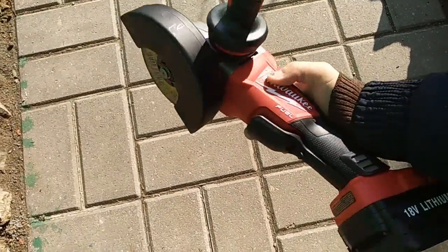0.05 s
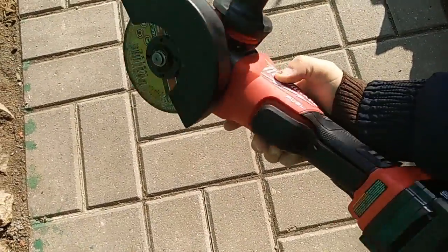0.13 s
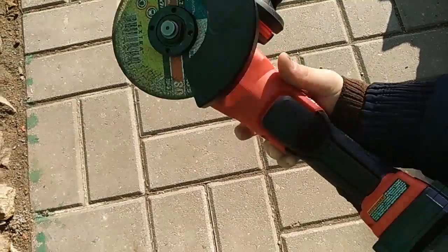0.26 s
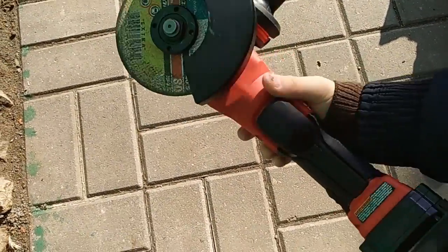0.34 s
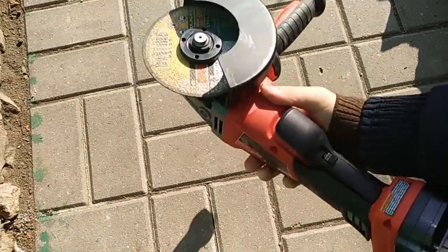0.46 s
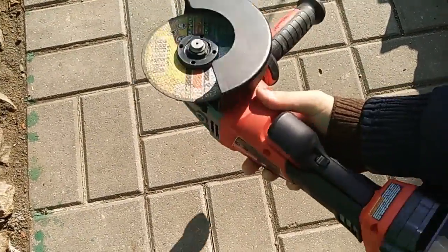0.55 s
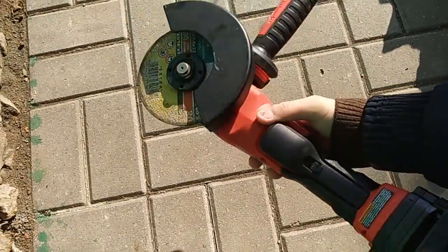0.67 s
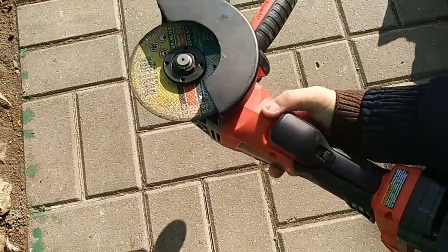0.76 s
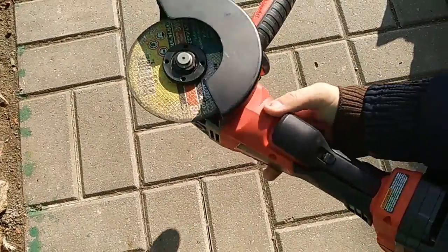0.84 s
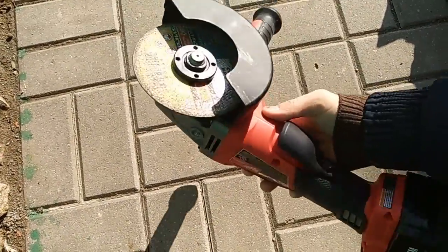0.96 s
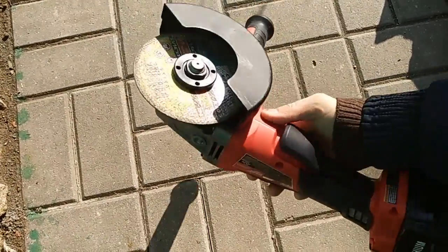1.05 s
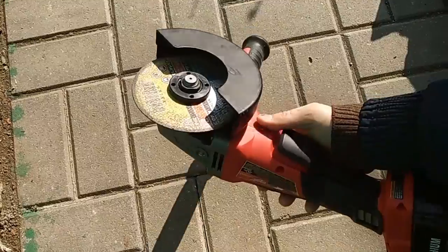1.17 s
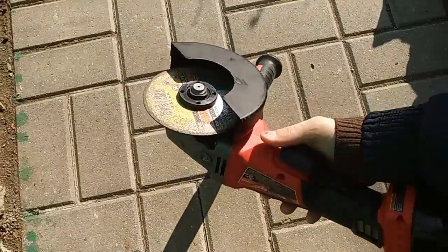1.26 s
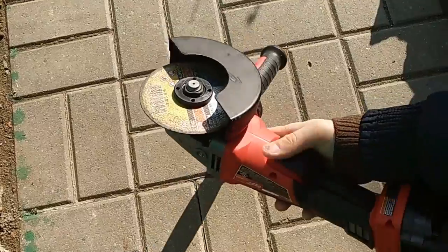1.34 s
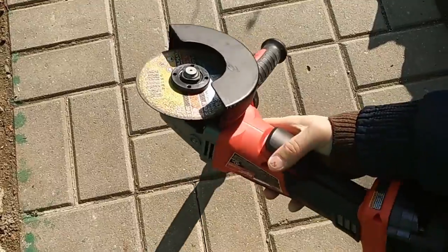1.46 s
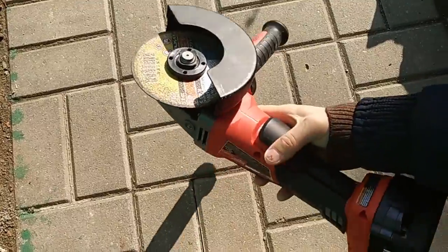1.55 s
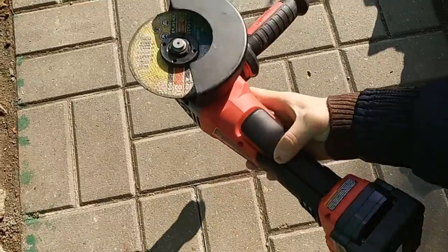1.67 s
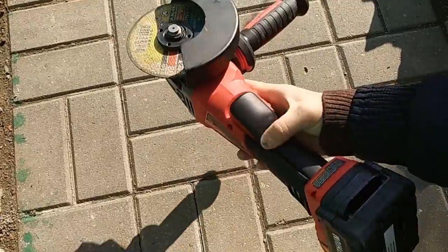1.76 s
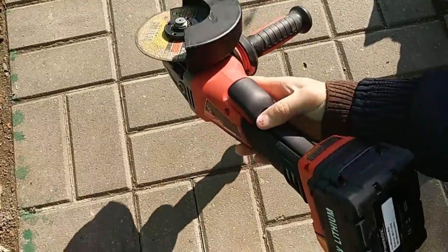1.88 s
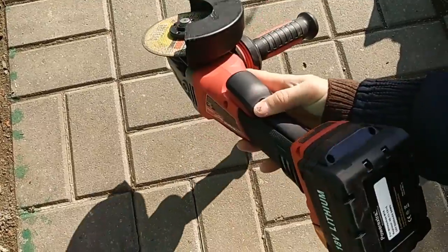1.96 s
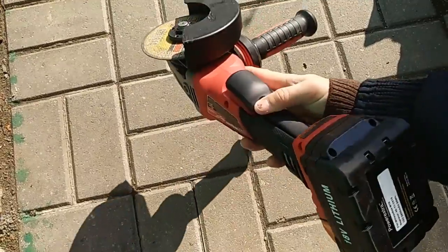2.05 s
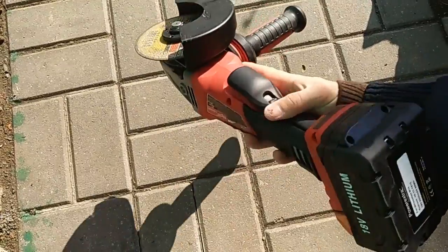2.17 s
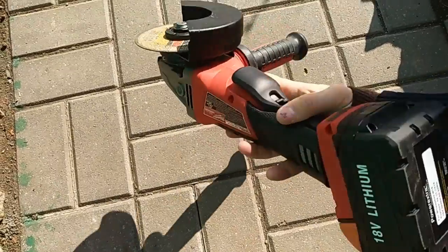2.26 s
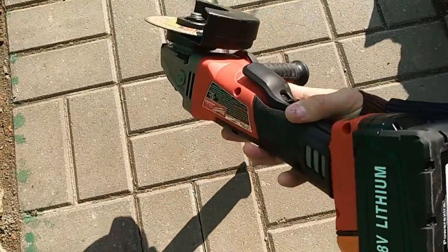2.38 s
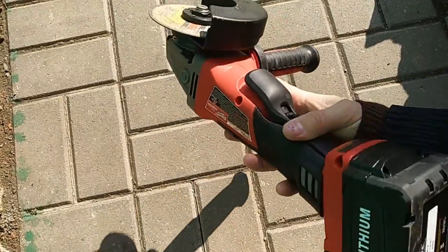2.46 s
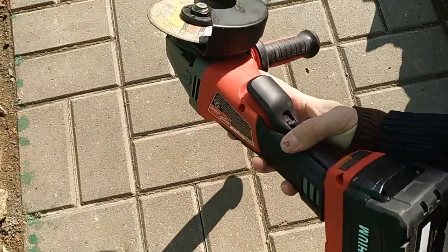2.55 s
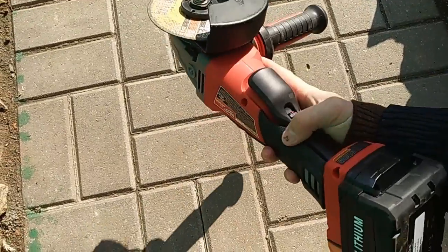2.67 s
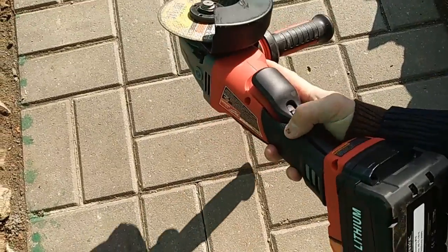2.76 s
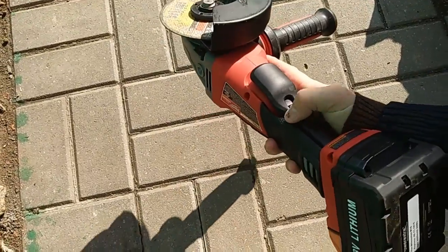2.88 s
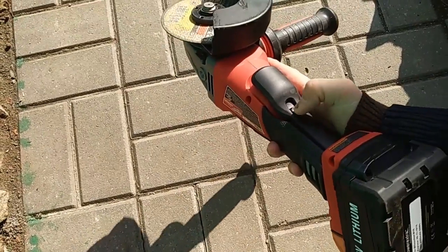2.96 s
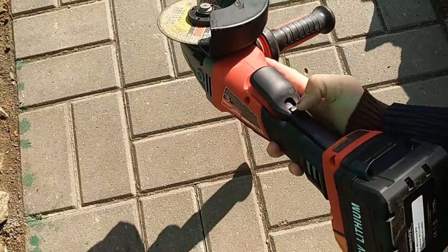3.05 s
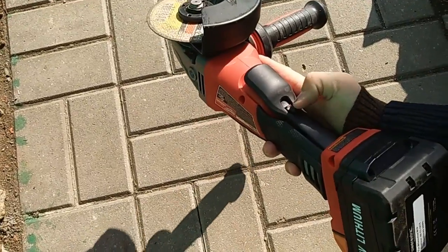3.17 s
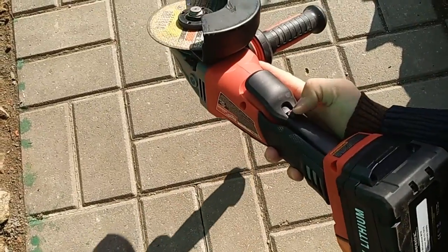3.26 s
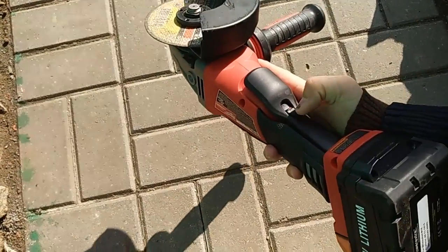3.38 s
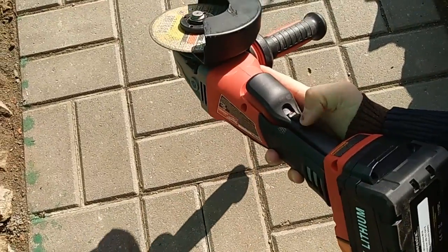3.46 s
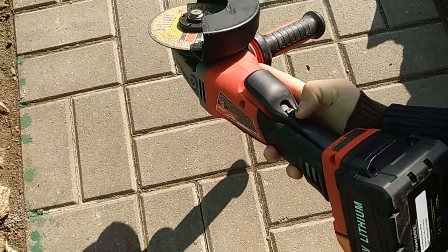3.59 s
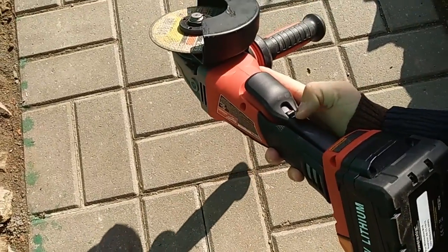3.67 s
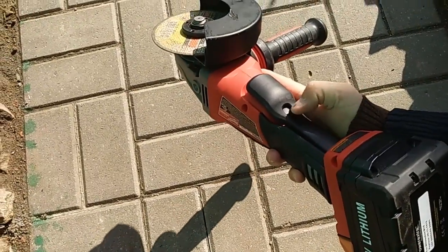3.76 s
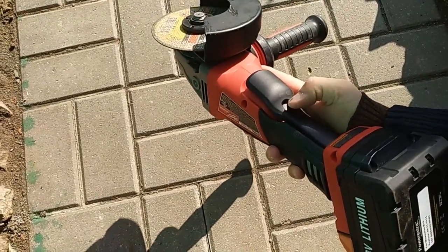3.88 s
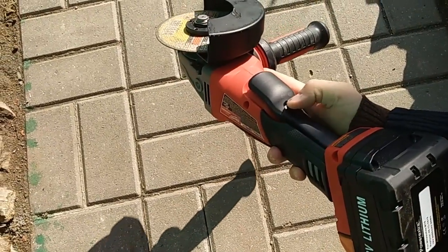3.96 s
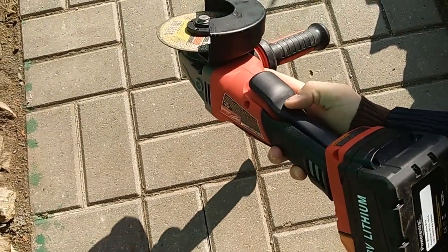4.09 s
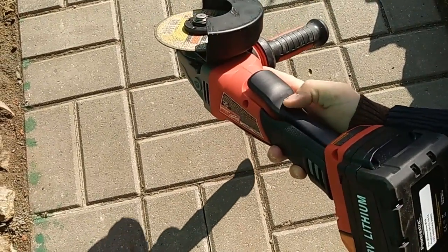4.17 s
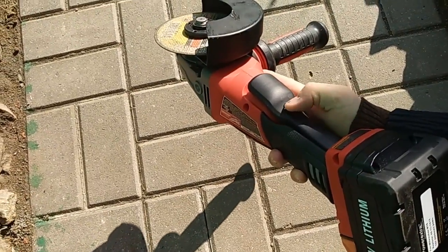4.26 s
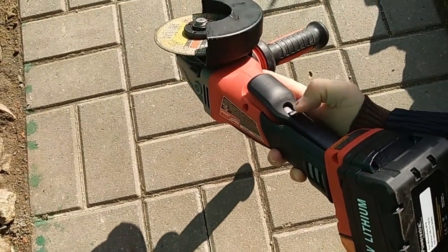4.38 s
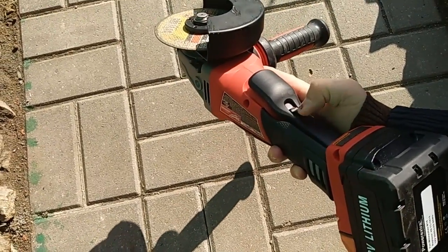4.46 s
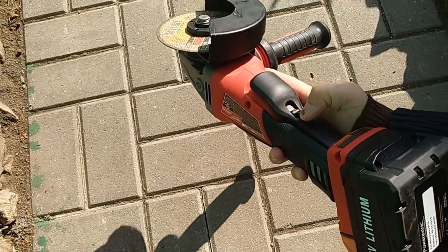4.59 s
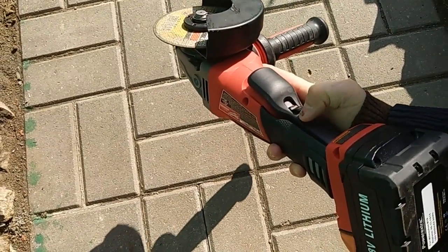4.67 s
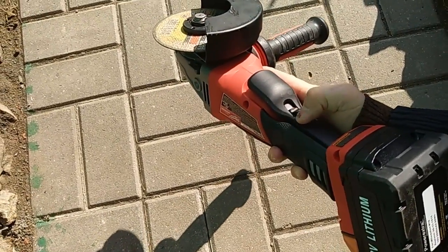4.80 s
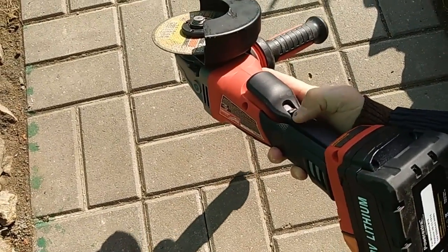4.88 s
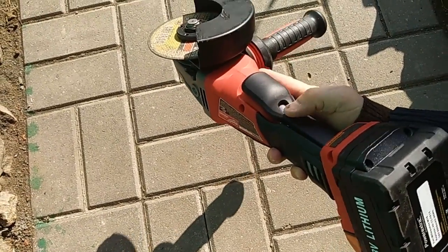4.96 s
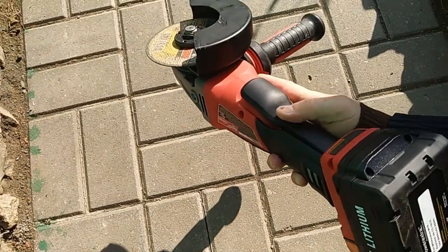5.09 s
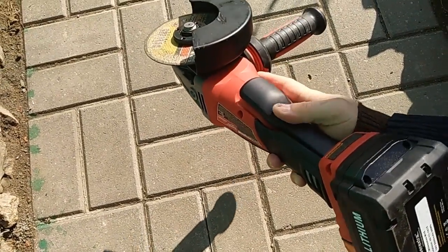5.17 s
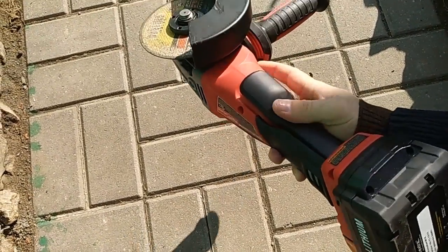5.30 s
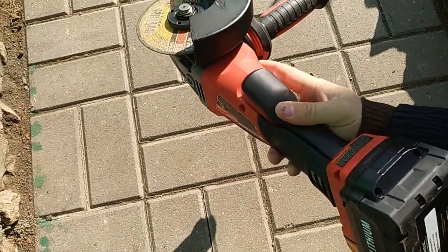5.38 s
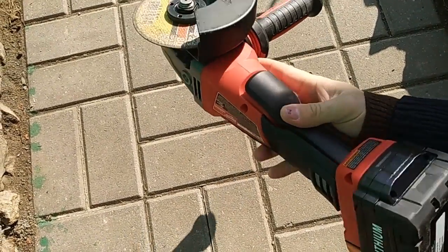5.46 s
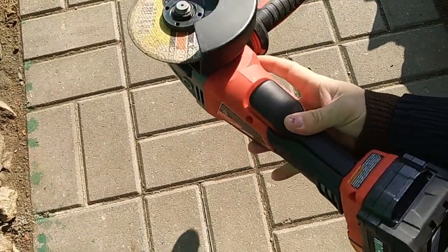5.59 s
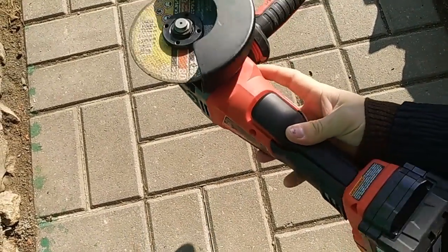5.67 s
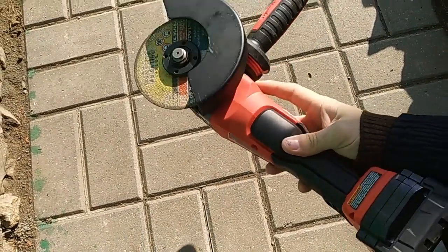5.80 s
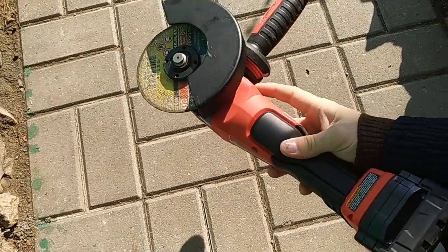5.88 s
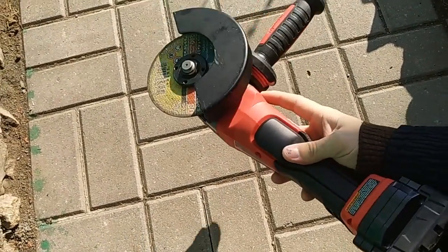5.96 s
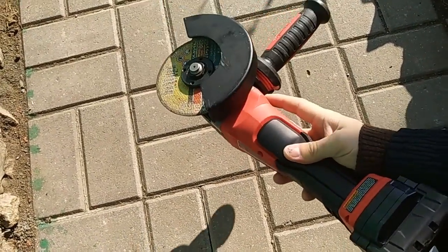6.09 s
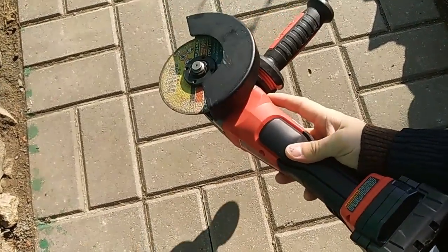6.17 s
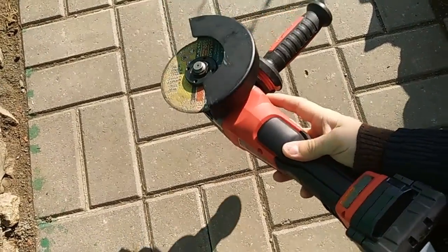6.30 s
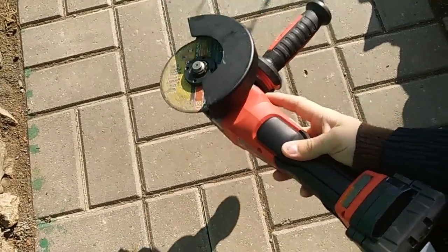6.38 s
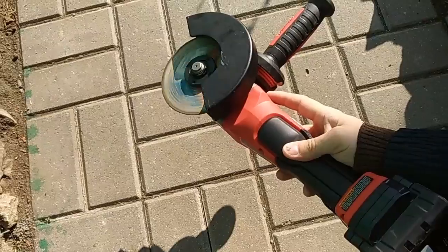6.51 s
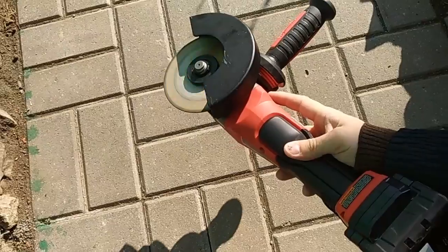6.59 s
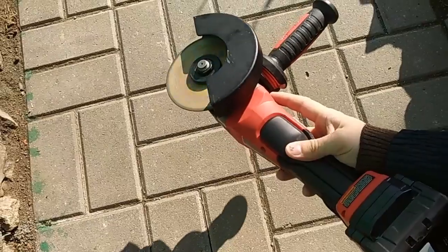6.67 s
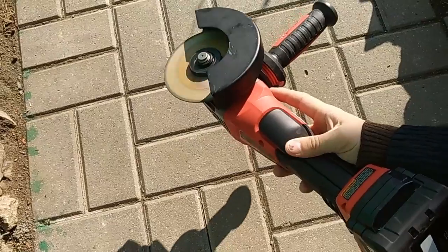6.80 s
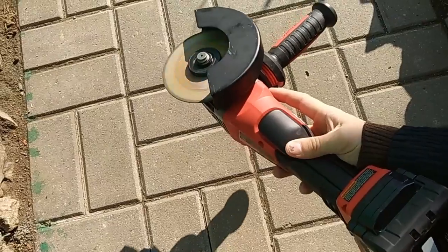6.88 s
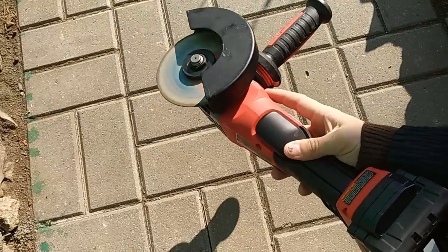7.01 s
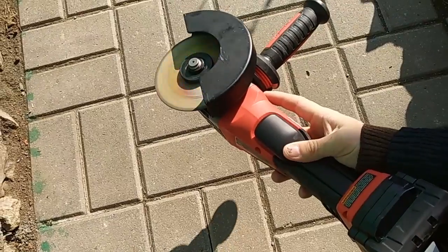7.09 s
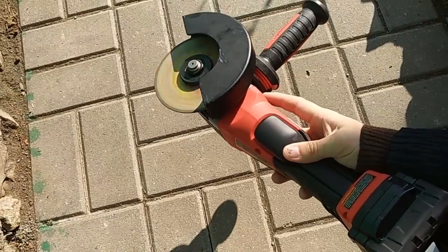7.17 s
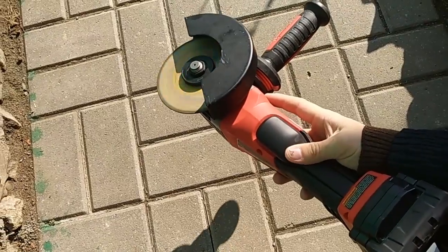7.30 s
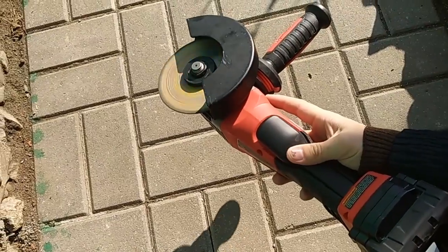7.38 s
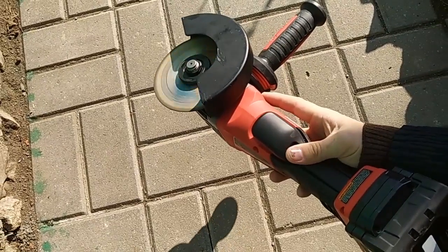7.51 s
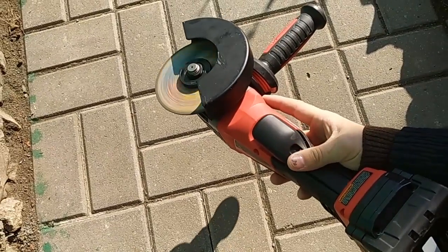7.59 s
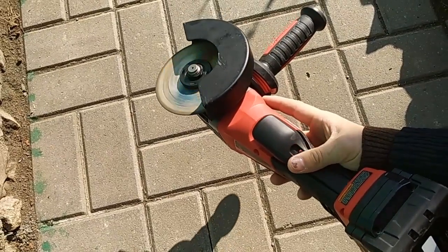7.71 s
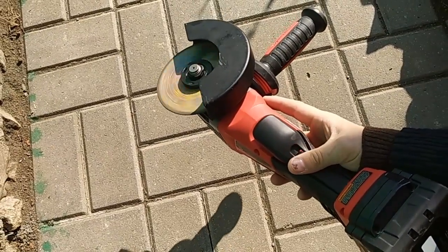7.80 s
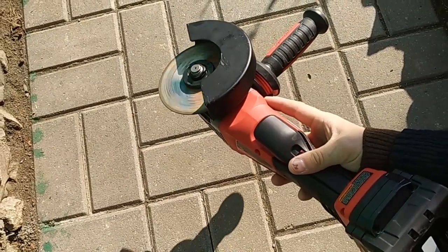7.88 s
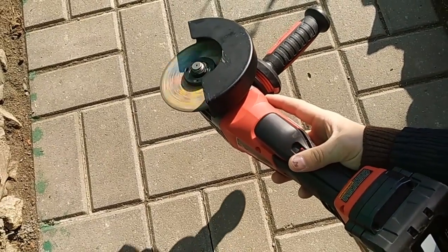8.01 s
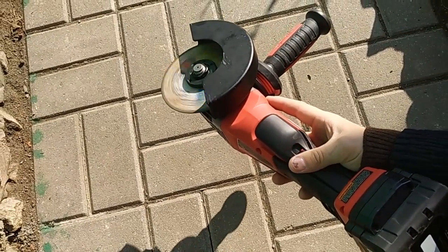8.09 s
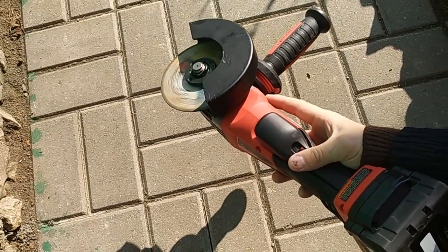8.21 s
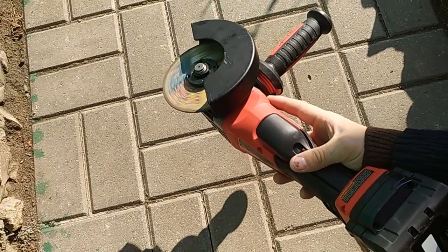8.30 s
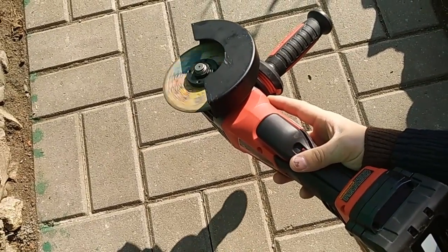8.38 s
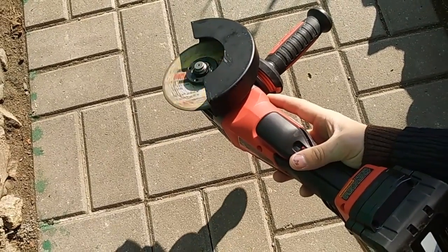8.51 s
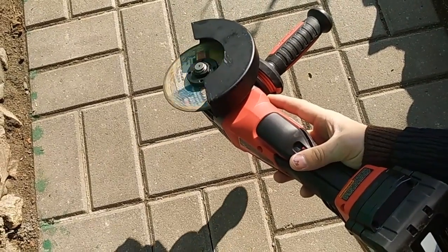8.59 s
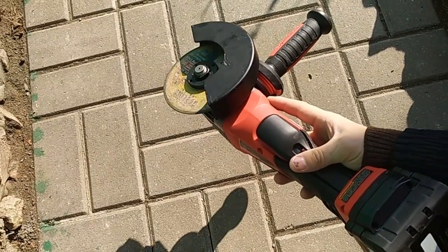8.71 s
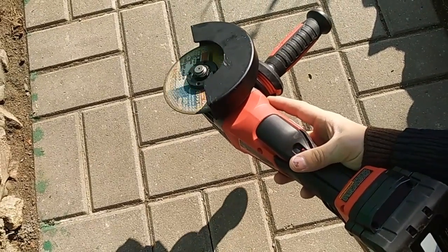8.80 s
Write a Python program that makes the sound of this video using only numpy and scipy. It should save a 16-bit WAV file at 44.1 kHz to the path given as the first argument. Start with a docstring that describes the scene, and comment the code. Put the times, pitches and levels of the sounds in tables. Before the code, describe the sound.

Close and dry in the open air, over a very faint low murmur. From 0 to 3 s a hand turns a cordless angle grinder: bright sleeve swishes, the strongest near 0.3 s, light palm scuffs and small plastic ticks, clustering around 0.4-1.1 s and near 3 s. A few faint ticks follow until 3.8 s, then near quiet. At 4.46 s a sharp switch snap leaves a short, high spring buzz. Cloth rustles at 5-5.8 s; a weaker double snap comes at 5.92 s. At 6.54 s the motor whistles at about 5 kHz and races up to a very high whine with fan rush and gear rattle. Power cuts at 6.88 s; it coasts down, squealing and clattering, metallic bounces hardest near 7.3 s, guard ringing around 1.4 kHz. By 8.2 s the rattle loosens into pulsing slaps, and from 8.65 s only uneven single knocks and faint rubbing remain.

```python
"""Outdoors above paving, a cordless angle grinder is turned over in the hand: a sleeve rustles, the grip
ticks, the switch snaps twice. Then the motor is blipped: its drive whistles, the rotor shoots up to a high
whine over rattling gears and fan air, then coasts until the rattle falls apart into single knocks.
Tones follow the computed rotor speed; rattle and handling are noise and pulses in ringing resonances."""
import sys
import numpy as np
from scipy import signal
from scipy.fft import rfft, irfft, next_fast_len
from scipy.io import wavfile
from scipy.ndimage import uniform_filter1d, map_coordinates

SR = 44100
rng = np.random.default_rng(int(sys.argv[2]) if len(sys.argv) > 2 else 0)


def digitize_waveform(pressure):
    """Quantize a signal to 16-bit integers and store it at the path in sys.argv[1].

    Rows of a 2-D input are taken as channels; values are limited to [-1, 1].
    """
    field = np.atleast_2d(pressure).T
    bounded = np.clip(field, -1, 1)
    quanta = np.round(bounded * 32767).astype(np.int16)
    wavfile.write(sys.argv[1], SR, quanta)


N = 390285
TIME = np.arange(N) / SR   # s

# Faint low background noise. Each row: time in seconds, level in dB before MURMUR_DB.
MURMUR_LEVEL = [(0.0, -65.5), (1.21, -69.5), (1.75, -81), (2.48, -64.5), (2.79, -76), (3.44, -71),
                (3.67, -77), (5.39, -87), (6.5, -76)]
# Colour of the background noise. Each row: frequency in Hz, relative density in dB per Hz.
MURMUR_COLOUR = [(30, -23.5), (110, -12), (170, -13), (300, 4.5), (400, -4), (520, -1), (750, -9),
                 (3000, -28.5)]
MURMUR_DB, MURMUR_WAVER_DB = 6.5, 14.5

# Faint narrow-band hiss. Each row: loudest moment in seconds, level in dB, half length in seconds, pitch in Hz.
NARROW_HISS = [(1.9, -78, 0.33, 2840), (3.714, -74.5, 0.085, 1500)]
HISS_WIDTH_HZ = 520   # of each of the two passes

# Strokes of the sleeve. Each row: fastest moment in seconds, level in dB, rise in seconds, fall in seconds.
SLEEVE_STROKES = [(.025, -49, 0.036, 0.05), (.23, -50.5, 0.11, 0.12), (0.314, -36.5, 0.029, 0.1),
                  (.565, -46, 0.069, 0.038), (0.659, -53.5, 0.038, 0.12), (0.86, -47, 0.01, 0.03),
                  (.955, -44, 0.037, 0.091), (1.15, -58, 0.28, 0.27), (1.45, -42.5, 0.1, 0.043),
                  (1.65, -57.5, 0.094, 0.11), (1.795, -66, 0.055, 0.065), (2.007, -57, 0.0057, 0.071),
                  (2.25, -50, 0.027, .04), (2.429, -42.5, 0.15, 0.091), (2.665, -59, 0.026, 0.13),
                  (2.851, -51, 0.061, 0.09), (5.04, -52, 0.032, 0.077), (5.296, -63, 0.013, 0.044),
                  (5.542, -56.5, 0.0076, 0.035), (5.625, -44, 0.02, 0.039), (5.7, -41, 0.045, 0.042),
                  (6.0, -49, 0.13, 0.19)]
# Colour of the cloth. Each row: frequency in Hz, relative density in dB per Hz.
CLOTH_COLOUR = [(150, -26.5), (500, -17.5), (1400, -8.5), (2500, -11), (4200, -9), (6000, -6.5), (9300, 1),
                (12000, -4.5), (15800, -17.5)]
# Palm scuffing the grip. Each row: fastest moment in seconds, level in dB, half length in seconds.
PALM_SCUFFS = [(0.347, -68, 0.046), (0.95, -46, 0.028), (2.42, -55.5, 0.16), (2.902, -68, 0.085),
               (3.435, -65, 0.035), (5.064, -62, 0.081), (5.425, -69.5, 0.18), (5.706, -53, 0.059)]
# Fingers ticking on the plastic grip. Each row: time in seconds, relative level in dB.
FINGER_TICKS = [(0.382, -32.5), (0.578, -38.5), (0.702, -46), (0.863, -43.5), (0.911, -35.5), (1.009, -27),
                (1.067, -40.5), (2.661, -44.5), (2.722, -41), (2.897, -42), (2.983, -28.5), (3.405, -34),
                (3.509, -56), (3.638, -57), (3.806, -39.5), (5.54, -47)]
# Resonances of the grip. Each row: frequency in Hz, width in Hz, level in dB.
GRIP_MODES = [(420, 90, -14), (737, 89, 0.5), (1284, 194, 3), (1840, 670, 1.5), (2340, 1000, -1),
              (3050, 410, 2.5), (5400, 1200, -10), (9050, 3600, -19)]
# The tool bumping softly in the hand. Each row: time in seconds, relative level in dB.
HAND_BUMPS = [(.92, -55), (2.11, -55), (3.32, -61), (6.11, -54)]
# Low resonances of the tool on the wrist. Each row: frequency in Hz, width in Hz, level in dB.
WRIST_MODES = [(45, 26, -1), (84, 61, -1.5), (139, 43, -6.5)]
CLOTH_PATCHY_DB, SKIN_PATCHY_DB = 3.2, 4.5   # unevenness of the noise from band to band

# Contacts of the switch snaps. Each row: time in seconds, level in dB, decay by 60 dB in seconds.
SWITCH_SNAPS = [(4.4634, 3, .005), (4.4643, 1.5, .006), (4.4667, -11, .007), (4.486, -17, .012),
                (5.9176, -11, .01), (5.9195, -5, .007), (5.9225, -28, .11)]
# Colour of the snaps. Each row: frequency in Hz, relative density in dB per Hz.
SNAP_COLOUR = [(40, -27), (400, -20), (950, -23), (1600, -10.5), (3200, -18), (6000, -18), (9300, -2.5),
               (11500, -11), (15800, -8)]
# Colour of the switch spring. Each row: frequency in Hz, relative density in dB per Hz.
SPRING_COLOUR = [(40, -11.5), (200, -23), (1200, -35), (3500, -23), (5000, -7), (6500, -12), (8700, -4),
                 (9450, 7), (10300, -5.5), (12500, -22), (15800, -17.5)]
# the spring buzzes on after the first snap: it swells to a peak, then dies away
SPRING_START_S, SPRING_PEAK_S = 4.464, 4.492
SPRING_DB, SPRING_SWELL_DB_PER_S, SPRING_T60_S = -23.5, 282, .26

# Dull pops at the loudest moments. Each row: time in seconds, level in dB before POP_DB and the low-pass.
DULL_POPS = [(4.4636, -28), (5.919, -32.5), (6.668, -37), (6.756, -29), (6.792, -29.5), (6.82, -36),
             (6.892, -32.5), (6.984, -36), (7.089, -30), (7.118, -33), (7.134, -31), (7.329, -36),
             (7.477, -27), (7.463, -32), (7.533, -29), (7.552, -32)]
POP_DB = 40

# spin-up: when the current is on, climb (turns/s per s), free speed (turns/s), time to settle on it
MOTOR_ON_S, MOTOR_OFF_S = 6.54, 6.88
SPIN_UP, FREE_SPEED, SETTLE_S = 1372, 335.2, .053
# coasting: dry friction (turns/s per s) and drag (share of the speed lost per s)
FRICTION, DRAG = 53.4, .831
# the current comes on just before the rotor moves, and builds up
CURRENT_LEAD_S, CURRENT_RISE_S = 0.0063, 0.066

WHINE_ORDER = 39   # multiple of the rotor rate
# The whine and its weaker neighbours. Each row: offset in rotor rates, relative level in dB.
WHINE_LINES = [(-3, -12), (0, 0), (3, -14)]
# Speeds between which the whine comes in on the way up, in turns per second.
WHINE_ENTRY = (215, 275)
# How strongly the housing radiates each whine line. Each row: frequency in Hz, level in dB.
WHINE_RESPONSE = [(5500, -46), (6300, -31), (8900, -28), (9400, -21), (10300, -14.5), (12100, -19),
                  (12900, -17), (13400, -30)]
# Rotor tones heard directly in the air. Each row: multiple of the rotor rate, level at full speed in dB.
HUM_ORDERS = [(3, -35), (5, -40)]
# Colour of the fan air. Each row: frequency in Hz, relative density in dB per Hz.
AIR_COLOUR = [(150, -23.5), (400, -14.5), (900, -6), (2000, -13), (4000, -0.5), (5250, 3), (6200, -5.5),
              (9000, 2), (11000, 2), (13000, -5), (15800, -4.5)]
# Partials of the drive whistle. Each row: multiple of the switching rate, offset in rotor rates,
# relative level in dB, speed in turns per second at which it has faded out.
DRIVE_LINES = [(1, -4, -4.5, 310), (1, 4, -2.5, 160), (2, -2, -19, 275), (3, 4, -19, 275)]
# switching rate, level, attack, and the span of speed (turns/s) over which a partial fades out
DRIVE_HZ, DRIVE_DB, DRIVE_ATTACK_S, DRIVE_FADE = 4950, -19, .025, 60

# Gear tones. Each row: multiple of the rotor rate, relative level in dB.
GEAR_ORDERS = [(16, 0), (20, -5), (32, -13)]
# Where the case passes the gear tones, used twice in series. Each row: frequency in Hz, width in Hz, level in dB.
CASE_VOICE = [(2840, 300, 1), (3950, 700, -5.5), (5200, 500, -4)]
# Low tones of the slack gears. Each row: multiple of the rotor rate, level at the peak in dB.
SLACK_ORDERS = [(4, -50), (12, -40), (14, -44)]
# Speeds at which the slack tones end, peak and begin while coasting, in turns per second.
SLACK_SPEEDS = (60, 135, 220)
# level through the case, its gain under full torque, and the direct sound under full torque (dB)
MESH_DB, MESH_TORQUE_DB, MESH_DIRECT_DB = -16.5, 3.5, -29

# Resonances of guard and disc. Each row: frequency in Hz, width in Hz, relative level in dB.
GUARD_MODES = [(436, 91, -10.5), (723, 59, -8), (966, 57, -8), (1346, 128, -6), (1466, 15.4, 3),
               (1530, 190, -11), (2050, 450, -11.5)]
# Resonances of the gear case. Each row: frequency in Hz, width in Hz, relative level in dB.
CASE_MODES = [(2680, 79, -3.5), (2898, 138, 1), (3118, 120, 1.5), (3387, 210, -1), (3540, 2700, -15)]
# Resonances of the spindle. Each row: frequency in Hz, width in Hz, relative level in dB.
SPINDLE_MODES = [(4484, 340, -4), (5170, 730, -0.5), (5760, 850, -7)]
# Resonances of the bearings. Each row: frequency in Hz, width in Hz, relative level in dB.
BEARING_MODES = [(6330, 980, -10.5), (7720, 600, 0), (9074, 740, 4.5), (9260, 390, 4), (9670, 320, 0),
                 (11200, 2500, -12.5), (11460, 1100, -10.5), (15800, 1400, -27)]
# Rattle of the guard. In order: level at speed in dB, speed in turns per second below which it fades
# when coasting, the same under power, power of the speed in that fade, level from full torque in dB.
GUARD_RATTLE = (-28.5, 188, 202, 0.71, -31.5)
# Rattle of the gear case, with the columns of GUARD_RATTLE.
CASE_RATTLE = (-24.5, 144, 200, 0.96, -15)
# Rattle of the spindle, with the columns of GUARD_RATTLE.
SPINDLE_RATTLE = (-27.5, 101, 150, 1, -20)
# Rattle of the bearings, with the columns of GUARD_RATTLE.
BEARING_RATTLE = (-19, 115.5, 226.5, 1.93, -26)
RATTLE_END_S = 8.66   # from here on only single knocks and a faint rub are left
PINION_TEETH = 13
# Speeds at which the slap per turn is absent, full, full and absent again, in turns per second.
ROTOR_SLAP_SPEEDS = (28, 44, 88, 190)
ROTOR_SLAP_DB, SLAP_AT_TURN = 17, .64   # greatest depth; place of the slap within the turn
# Bearing resonance for the squeal, used twice in series. Each row: frequency in Hz, width in Hz, level in dB.
SQUEAL_VOICE = [(8900, 1700, 0)]
SQUEAL_DB = -24

# Hard bounces of the disc in the play of the gears, early in the coast. Each entry: time in seconds.
BOUNCES_S = [6.917, 6.937, 6.969, 7.003, 7.035, 7.12, 7.133, 7.149, 7.161, 7.177, 7.194, 7.207, 7.22, 7.233,
             7.246, 7.259, 7.273, 7.286, 7.301, 7.314, 7.328, 7.342, 7.36, 7.372, 7.387, 7.41, 7.443, 7.482,
             7.516, 7.534, 7.551, 7.603, 7.638, 7.666, 7.681]
# Force of the bounces. In order: hardest moment in seconds, level in dB, rise in seconds, fall in seconds.
HAMMER_SWELL = (7.27, 23.5, 0.24, 0.42)
# Ring of the bounces in the gear case. Each row: frequency in Hz, width in Hz, level in dB.
HAMMER_MODES = [(3070, 123, 4.5), (3480, 330, -7), (5270, 410, -24), (7400, 390, -4.5), (9200, 1300, -12)]
JOLT_DB, JOLT_S = 6, .003   # gain each bounce adds to the rattle before levelling, and its decay time

# Jolts that ring the guard. Each row: time in seconds, relative level in dB.
GUARD_CLANGS = [(6.985, -15), (7.155, -12), (7.338, -15.5), (7.385, -18.5), (7.48, -16.5), (7.77, -17),
                (7.86, -16), (8.795, -28.5)]
# Ring of the jolted guard. Each row: frequency in Hz, width in Hz, level in dB.
CLANG_MODES = [(1378, 83, 4), (1436, 26, 11)]
# between jolts it sings on: pitch, level against its rattle, waver of the phase
SONG_HZ, SONG_DB, SONG_WAVER_CYCLES = 1470, -8, .2

# Single knocks of the teeth. Each row: time in seconds, dull knock in dB, bright click in dB (both relative).
TOOTH_KNOCKS = [(8.2073, -19, -2), (8.2256, -21, -9), (8.2560, -28, -14), (8.292, -28, -12),
                (8.359, -28, -11), (8.4542, -19, -6.5), (8.552, -25, -25), (8.606, -25, -19),
                (8.6190, -20, -26), (8.636, -21, -19), (8.6544, -16.5, -11.5), (8.6812, -18.5, -9),
                (8.7071, -19.5, -17.5), (8.735, -26.5, -29), (8.7587, -17, -17), (8.7920, -15, -12.5),
                (8.82, -16.5, -15.5), (8.8475, -16.5, -10)]
KNOCK_DB, CLICK_DB = 7, 2


def from_db(db):
    """Decibels to gain."""
    return np.exp(np.asarray(db) * (np.log(10) / 20))


def rms_one(x):
    """Scale to rms 1."""
    return x / np.sqrt(np.mean(x ** 2) + 1e-20)


def drift(rate):
    """Smooth chance of spread 1 that changes about rate times a second."""
    points = rng.standard_normal(N // 16)
    curve = map_coordinates(points, [TIME[::16] * rate], order=2, mode="wrap")
    return np.repeat(rms_one(curve), 16)[:N]


def colour(x, spectrum):
    """Causal (minimum-phase) filter with the shape of the spectrum and unit power gain."""
    hz, db = np.transpose(spectrum)
    grid = np.linspace(1, SR / 2, 2049)
    gain = from_db(np.interp(np.log(grid), np.log(hz), db))
    # folding the cepstrum onto positive times makes the phase minimal
    cepstrum = irfft(np.log(gain))
    cepstrum[1:2048] *= 2
    cepstrum[2049:] = 0
    response = irfft(np.exp(rfft(cepstrum)))
    return signal.oaconvolve(x, response / np.linalg.norm(response))[:N]


def resonate(x, modes):
    """Parallel resonances with alternating signs."""
    out = 0
    for k, (hz, width, db) in enumerate(modes):
        r = np.exp(-np.pi * width / SR)
        poles = [1, -2 * r * np.cos(2 * np.pi * hz / SR), r * r]
        ring = signal.lfilter([1, 0, -1], poles, x + 1e-18)
        out = out + (-1) ** k * from_db(db) * (1 - r * r) / 2 * ring
    return out


def tone(cycles):
    """Sine of rms 1."""
    return np.sqrt(2) * np.sin(2 * np.pi * cycles)


def grit(rate, spread_db):
    """Noise made of tiny contacts of uneven strength."""
    return rms_one(rng.standard_normal(N) * from_db(spread_db * drift(rate)))


def bursts(rows):
    """Short dying bursts of contact noise from rows of (s, dB, t60 s)."""
    envelope, age = np.zeros(N), TIME[:SR // 2]
    for s, db, t60 in rows:
        start = int(s * SR)
        part = from_db(db - 60 * age / t60)[:max(N - start, 0)]
        envelope[start:start + len(part)] += part
    return envelope * rng.standard_normal(N)


def blows(events, modes, t60, tail_db, tail_t60):
    """Each contact is a crack and a weaker after-rattle into the modes of a body."""
    cracks = bursts([(s, db, t60) for s, db in events])
    tails = bursts([(s, db + tail_db, tail_t60) for s, db in events])
    return resonate(cracks + tails, modes)


def impulses(rows):
    """Single pulses of either sign from rows of (s, dB)."""
    s, db = np.transpose(rows)
    out = np.zeros(N)
    out[(s * SR).astype(int)] = from_db(db) * rng.choice([-1, 1], len(s))
    return out


def swell(s, db, rise_s, fall_s):
    """Bell-shaped gain that peaks at time s, as for a sliding movement that is fastest there."""
    distance = (TIME - s) / np.where(TIME < s, rise_s, fall_s)
    return from_db(db) * np.exp(-np.minimum(distance ** 2, 40))


def patchy_noise(patchy_db):
    """Noise whose narrow bands swell and fade on their own, so that its colour keeps changing."""
    out, white = 0, rng.standard_normal((2, N))
    edges = np.linspace(10, 127, 37) ** 2   # Hz
    for k, band in enumerate(zip(edges, edges[1:])):
        band_filter = signal.butter(2, band, "band", fs=SR, output="sos")
        # neighbouring bands take different noise
        out = out + signal.sosfilt(band_filter, white[k % 2]) * from_db(patchy_db * drift(14))
    return rms_one(out * from_db(1.5 * drift(1000) + 1.2 * drift(70)))


def background():
    """A faint low murmur of noise, its narrow bands swelling and fading, over a trace of hiss."""
    murmur, edges = 0, np.r_[25:700:55, 780, 900, 1050]   # Hz
    for low, high in zip(edges, edges[1:]):
        band_filter = signal.butter(2, [low, high], "band", fs=SR, output="sos")
        band = signal.sosfilt(band_filter, rng.standard_normal(N))
        murmur = murmur + band * from_db(MURMUR_WAVER_DB * np.tanh(drift(11) - .7))
    level = from_db(np.interp(TIME, *np.transpose(MURMUR_LEVEL)) + MURMUR_DB)
    hiss = signal.lfilter(*signal.butter(2, 9000, fs=SR), rng.standard_normal(N))
    return level * rms_one(colour(murmur, MURMUR_COLOUR)) + from_db(-86) * hiss


def narrow_hiss():
    """Faint narrow bands of hiss swell and fade: patchy noise through a resonance, twice."""
    noise, hiss = patchy_noise(SKIN_PATCHY_DB), 0
    for s, db, length, hz in NARROW_HISS:
        band = [(hz, HISS_WIDTH_HZ, 0)]
        narrow = rms_one(resonate(resonate(noise, band), band))
        hiss = hiss + swell(s, db, length, length) * narrow
    return hiss


def sleeve():
    """Cloth swishes over the tool: patchy noise, loudest where a stroke is fastest."""
    sliding = np.sqrt(sum(swell(*stroke) ** 2 for stroke in SLEEVE_STROKES))
    return sliding * colour(patchy_noise(CLOTH_PATCHY_DB), CLOTH_COLOUR)


def palm():
    """Skin scuffs the grip: patchy noise through its resonances, loudest where the hand is fastest."""
    press = sum(swell(s, db, length, length) for s, db, length in PALM_SCUFFS)
    return press * rms_one(resonate(patchy_noise(SKIN_PATCHY_DB), GRIP_MODES))


def handling():
    """Sleeve and palm slide on the housing, fingers tick on the grip, the tool bumps in the hand."""
    ticks = from_db(2.0) * blows(FINGER_TICKS, GRIP_MODES, t60=0.054, tail_db=-20, tail_t60=0.3)
    bumps = from_db(27.0) * blows(HAND_BUMPS, WRIST_MODES, t60=0.18, tail_db=-18, tail_t60=0.27)
    return sleeve() + palm() + ticks + bumps


def switch():
    """The slider snaps over in a few quick contacts and, after the first snap, its spring buzzes out."""
    age = TIME - SPRING_PEAK_S
    below_peak_db = np.maximum(-SPRING_SWELL_DB_PER_S * age, 60 * age / SPRING_T60_S)
    level = from_db(SPRING_DB - np.minimum(below_peak_db, 150)) * (TIME > SPRING_START_S)
    buzz = level * colour(grit(600, spread_db=1.0), SPRING_COLOUR)
    return colour(bursts(SWITCH_SNAPS), SNAP_COLOUR) + buzz


def pops():
    """Single pulses, dulled by a gentle low-pass."""
    return from_db(POP_DB) * signal.lfilter(*signal.butter(1, 900, fs=SR), impulses(DULL_POPS))


def rotor_speed():
    """Turns per second: a straight climb at the current limit, settling, then coasting on friction and drag."""
    knee = FREE_SPEED - SPIN_UP * SETTLE_S   # speed at which the straight climb ends
    powered_s = np.clip(TIME, MOTOR_ON_S, MOTOR_OFF_S) - MOTOR_ON_S
    settling_s = np.maximum(powered_s - knee / SPIN_UP, 0)
    climb = np.minimum(SPIN_UP * powered_s, knee)
    driven = climb + (FREE_SPEED - knee) * (1 - np.exp(-settling_s / SETTLE_S))
    kept = np.exp(-DRAG * np.maximum(TIME - MOTOR_OFF_S, 0))
    return np.maximum(driven * kept - FRICTION / DRAG * (1 - kept), 0)


def switched_on(rise_s):
    """Rises from 0 to 1 when the current comes on, and is 0 once it is cut."""
    return np.clip((TIME - MOTOR_ON_S + CURRENT_LEAD_S) / rise_s, 0, 1) * (TIME < MOTOR_OFF_S)


def torque(speed):
    """Pull of the motor, 0 to 1: full at the current limit, gone at free speed."""
    return switched_on(CURRENT_RISE_S) * np.clip((FREE_SPEED - speed) / (SPIN_UP * SETTLE_S), 0, 1)


def rattle_level(speed, db, coasting_knee, powered_knee, power, torque_db):
    """A part rattles harder with speed, up to a knee, and harder still while the motor pulls."""
    knee = np.where(TIME < MOTOR_OFF_S, powered_knee, coasting_knee)
    spinning = from_db(db) * np.minimum(speed / knee, 1) ** power
    return np.hypot(spinning, from_db(torque_db) * torque(speed)) * (TIME < RATTLE_END_S)


def last_knocks():
    """Each knock of the teeth thuds in case and guard and clicks in spindle and bearings."""
    dull = [(s, db) for s, db, _ in TOOTH_KNOCKS]
    bright = [(s, db) for s, _, db in TOOTH_KNOCKS]
    thuds = blows(dull, CASE_MODES, t60=.016, tail_db=-20, tail_t60=.05)
    thuds += blows(dull, GUARD_MODES, t60=.035, tail_db=-11, tail_t60=.08)
    clicks = blows(bright, SPINDLE_MODES, t60=.008, tail_db=-20, tail_t60=.04)
    clicks += from_db(-13) * blows(bright, BEARING_MODES, t60=0.05, tail_db=-12, tail_t60=0.087)
    return from_db(KNOCK_DB) * thuds + from_db(CLICK_DB) * clicks


def disc_rub():
    """The disc rubs faintly between the last knocks: uneven grit in guard and case."""
    rubbing = rms_one(resonate(grit(180, spread_db=5), GUARD_MODES + CASE_MODES))
    return from_db(-42) * (TIME > RATTLE_END_S) * rubbing


def guard_song(speed):
    """The shaken guard keeps up a thin, slightly wavering ring."""
    level = rattle_level(speed, *GUARD_RATTLE) * from_db(SONG_DB + 2 * drift(20))
    return level * tone(SONG_HZ * TIME + SONG_WAVER_CYCLES * drift(18))


def guard_clangs():
    """Single jolts strike the resonances of the guard."""
    return from_db(37) * resonate(impulses(GUARD_CLANGS), CLANG_MODES)


def bounces():
    """One pulse for each bounce of the disc."""
    return impulses([(s, 0) for s in BOUNCES_S])


def hammering():
    """The bounces ring in the gear case, hardest in the middle of their run."""
    return resonate(bounces() * swell(*HAMMER_SWELL), HAMMER_MODES)


def jolts():
    """Gain of the rattle: it leaps at each bounce of the disc and sinks between them."""
    decay = np.exp(-1 / (JOLT_S * SR))
    gate = 1 + from_db(JOLT_DB) * signal.lfilter([1], [1, -decay], abs(bounces()) + 1e-18)
    return gate / np.sqrt(uniform_filter1d(gate ** 2, SR // 8))


def chatter(turns, depth_db, uneven_db):
    """Once a turn the teeth slap through their play and settle, with a strength drawn for each slap."""
    strength = rng.standard_normal(2048)[turns.astype(int) % 2048]
    gate = from_db(uneven_db * strength - depth_db * (turns % 1))
    return gate / np.sqrt(uniform_filter1d(gate ** 2, SR // 8) + 1e-12)


def tooth_clicks(turns):
    """Every pinion tooth clicks with a strength of its own, the same on each turn."""
    tooth = (turns * PINION_TEETH).astype(int)
    strength = rng.permutation(np.linspace(-.7, 1.3, PINION_TEETH))
    clicks = np.diff(tooth, prepend=0) * strength[tooth % PINION_TEETH]
    return clicks / np.sqrt(uniform_filter1d(clicks ** 2, SR // 8) + 1e-4)


def squeal(speed, turns, slaps):
    """Rough overtones of the whine squeal as they fall through a resonance of the bearings."""
    overtones = 0
    for multiple, share in ((2, .4), (3, 1)):
        overtones = overtones + share * tone(multiple * WHINE_ORDER * turns + .3 * drift(500))
    coasting = (TIME > MOTOR_OFF_S) * (speed > 0)
    rough = coasting * slaps * overtones
    return from_db(SQUEAL_DB) * resonate(resonate(rough, SQUEAL_VOICE), SQUEAL_VOICE)


def gears(speed, turns):
    """Grit and tooth clicks shake guard, case, spindle and bearings; without power the slack teeth slap."""
    slap_share = np.interp(speed, ROTOR_SLAP_SPEEDS, [0, 1, 1, 0])
    depth_db = ROTOR_SLAP_DB * (TIME > MOTOR_OFF_S) * slap_share
    slaps = chatter(turns - SLAP_AT_TURN + .02 * drift(90), depth_db, uneven_db=.7) * jolts()
    clicks = .5 * tooth_clicks(turns)

    def shaken(modes, rattle, teeth, sharpness=1):
        """Each resonance takes a changing share of the blows."""
        drive = (grit(1500, spread_db=3.0) + teeth) * slaps ** sharpness
        ring = 0
        for k, mode in enumerate(modes):
            ring = ring + (-1) ** k * resonate(drive * from_db(1.7 * drift(45)), [mode])
        return rattle_level(speed, *rattle) * ring / np.std(ring[speed > 0])

    rattle = shaken(GUARD_MODES, GUARD_RATTLE, clicks / 3)
    rattle += shaken(CASE_MODES, CASE_RATTLE, clicks)
    rattle += shaken(SPINDLE_MODES, SPINDLE_RATTLE, clicks, sharpness=1.35)
    rattle += shaken(BEARING_MODES, BEARING_RATTLE, clicks)
    return rattle + squeal(speed, turns, slaps)


def mesh(speed, turns):
    """Gear tones flare as they glide through the resonances of the case, with a boost while the motor pulls."""
    rough_turns, pull = turns + .004 * drift(120), torque(speed)
    tones = sum(from_db(db + 2 * drift(40)) * tone(order * rough_turns) for order, db in GEAR_ORDERS)
    tones = (speed > 0) * tones
    through_case = resonate(resonate(tones, CASE_VOICE), CASE_VOICE)
    case_level = from_db(MESH_DB + MESH_TORQUE_DB * pull)
    direct_level = from_db(MESH_DIRECT_DB) * pull * np.minimum(2 * speed / FREE_SPEED, 1) ** 2
    slack = (TIME > MOTOR_OFF_S) * np.interp(speed, SLACK_SPEEDS, [0, 1, 0])
    low_tones = slack * sum(from_db(db) * tone(order * rough_turns) for order, db in SLACK_ORDERS)
    return low_tones + case_level * through_case + direct_level * tones


def fan_air(share):
    """Rushing noise that grows with the square of the speed."""
    return from_db(-12.5) * share ** 2.0 * colour(grit(400, spread_db=3.5), AIR_COLOUR)


def drive_whistle(speed, turns):
    """The switching of the drive whistles; its partials slide with the rotor and fade as it speeds up."""
    whistle = 0
    for multiple, offset, db, gone in DRIVE_LINES:
        level = from_db(db + 2 * drift(70)) * np.clip((gone - speed) / DRIVE_FADE, 0, 1)
        whistle = whistle + level * tone(multiple * DRIVE_HZ * TIME + offset * turns)
    return from_db(DRIVE_DB) * switched_on(DRIVE_ATTACK_S) * whistle


def rotor_whine(speed, turns):
    """High lines locked to the rotor, as loud as the housing radiates at their pitch."""
    flutter = .05 * drift(150)   # the turning is slightly uneven
    whine = 0
    for offset, db in WHINE_LINES:
        order = WHINE_ORDER + offset
        response_db = np.interp(order * speed, *np.transpose(WHINE_RESPONSE), left=-150)
        whine = whine + from_db(db + response_db + 2.5 * drift(60)) * tone(order * turns + flutter)
    held_back = switched_on(DRIVE_ATTACK_S) * np.interp(speed, WHINE_ENTRY, [1, 0])
    return (1 - held_back) * whine


def motor(speed, turns):
    """Whine and hum locked to the rotor, fan air that grows with speed, and the whistle of the drive."""
    share = speed / speed.max()
    hum = sum(from_db(db + 1.8 * drift(25)) * tone(order * turns) for order, db in HUM_ORDERS)
    return rotor_whine(speed, turns) + share ** 3 * hum + fan_air(share) + drive_whistle(speed, turns)


def grinder():
    """One rotor speed drives motor and gears; the guard rings, the disc bounces, and the last knocks follow."""
    speed = rotor_speed()
    turns = np.cumsum(speed) / SR
    running = gears(speed, turns) + mesh(speed, turns) + motor(speed, turns)
    guard = guard_clangs() + guard_song(speed)
    return running + hammering() + guard + last_knocks() + disc_rub()


def scene():
    """Everything is close to one microphone in the open air."""
    return (background() + narrow_hiss() + handling() + switch() + pops() + grinder())[None]


def record(dry):
    """The loudest peaks are rounded off and the top is cut above 15.8 kHz."""
    rounded = 1.18 * np.tanh(dry / 1.158)
    return signal.sosfilt(signal.ellip(12, .2, 80, 15800, fs=SR, output="sos"), rounded)


dry = scene()
out = record(dry)
digitize_waveform(out)
```